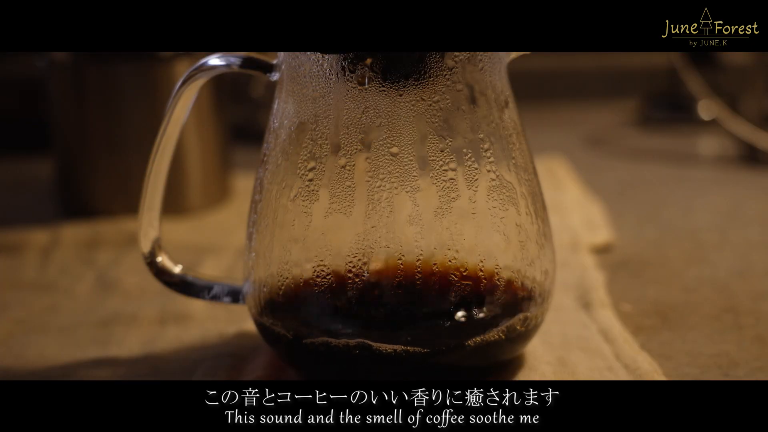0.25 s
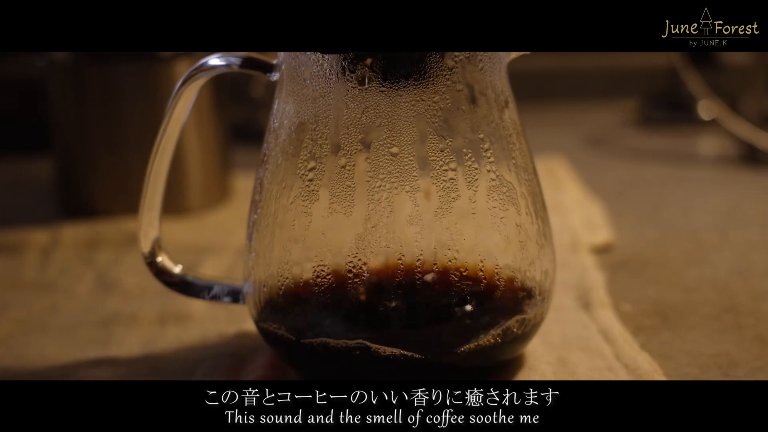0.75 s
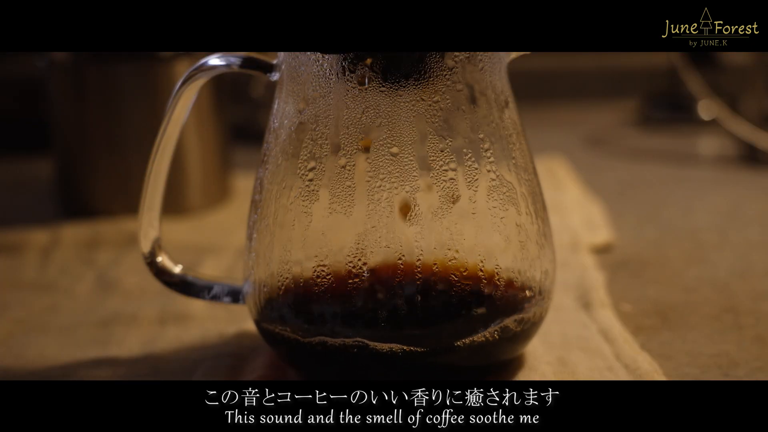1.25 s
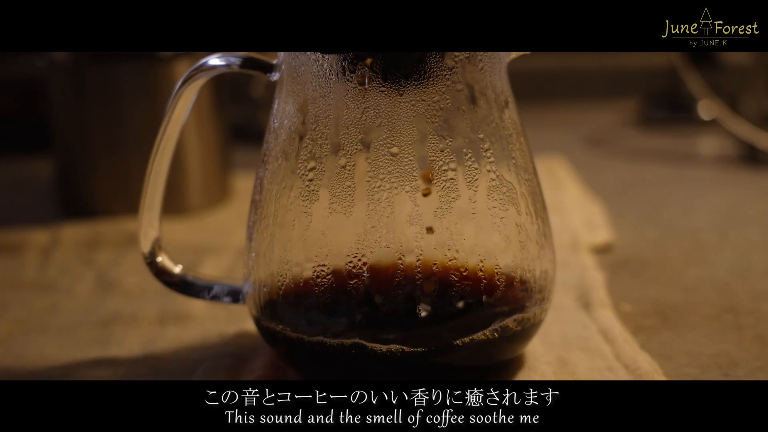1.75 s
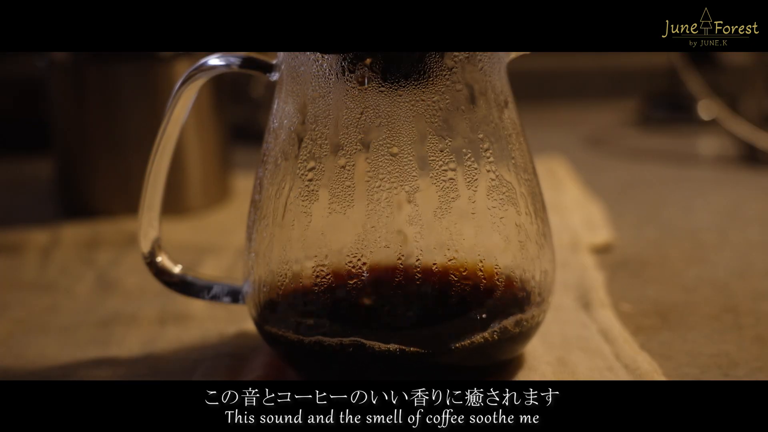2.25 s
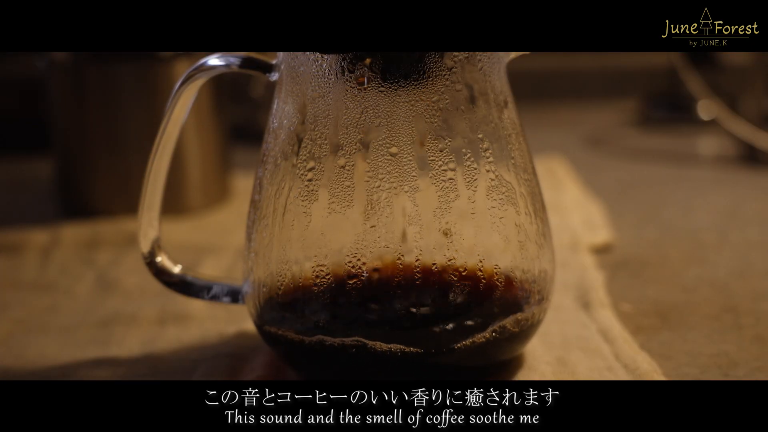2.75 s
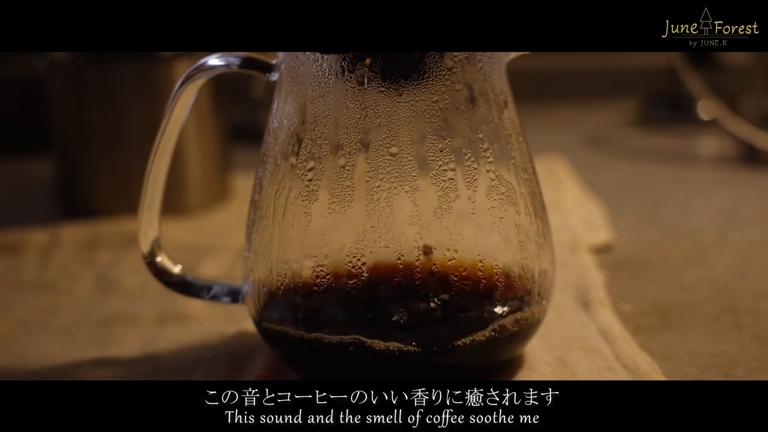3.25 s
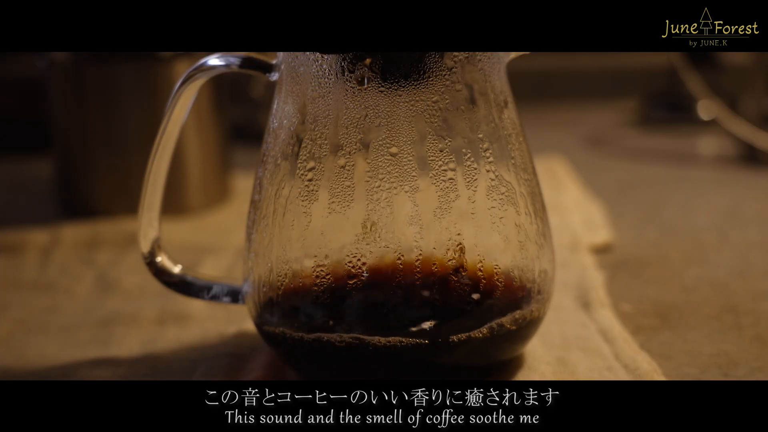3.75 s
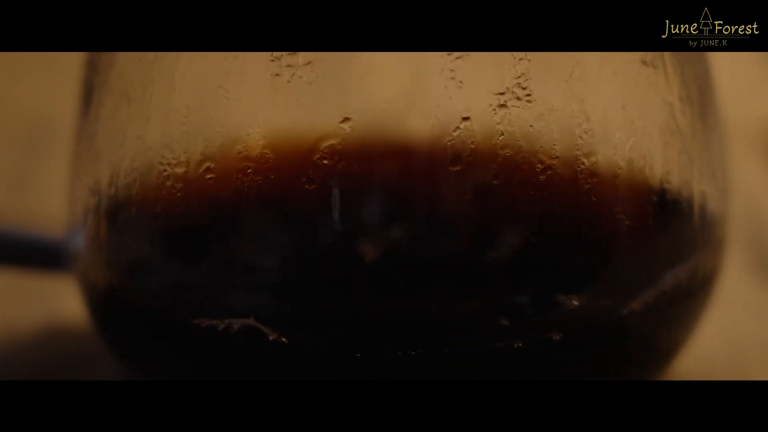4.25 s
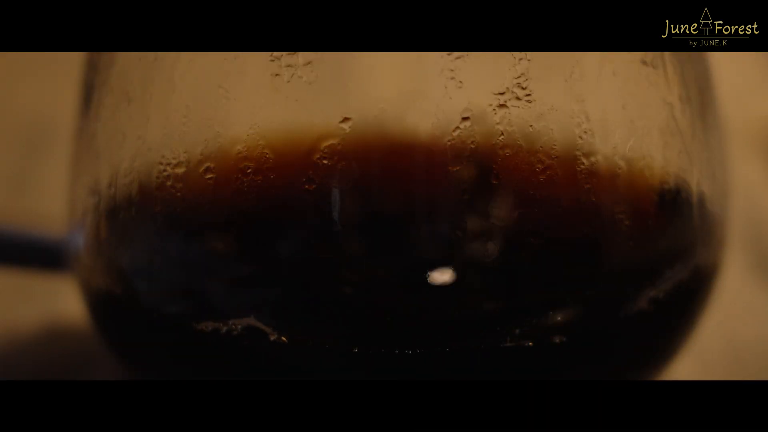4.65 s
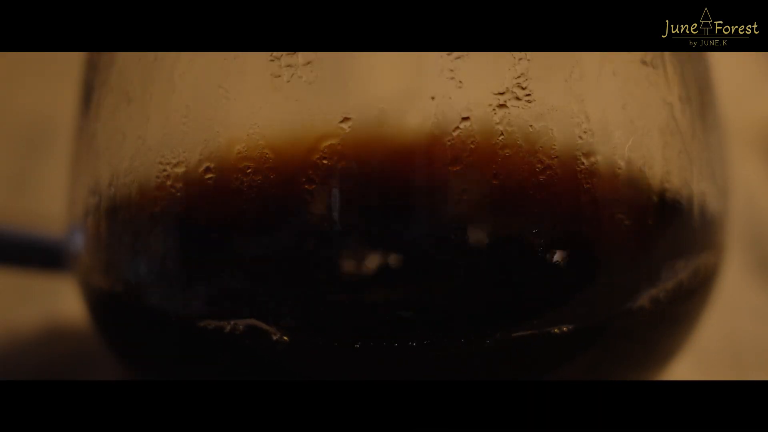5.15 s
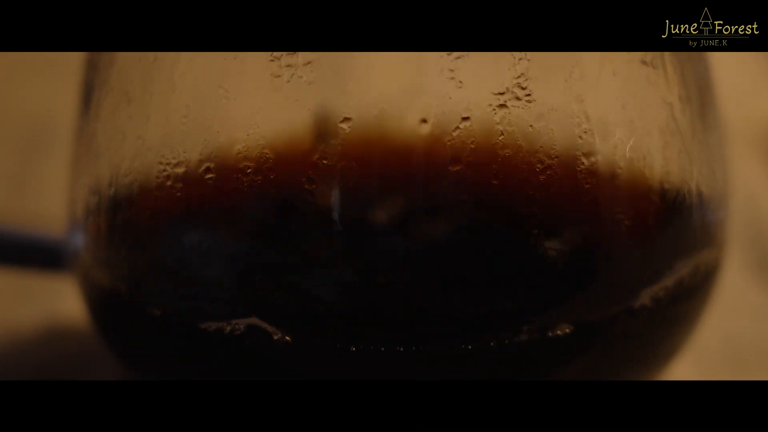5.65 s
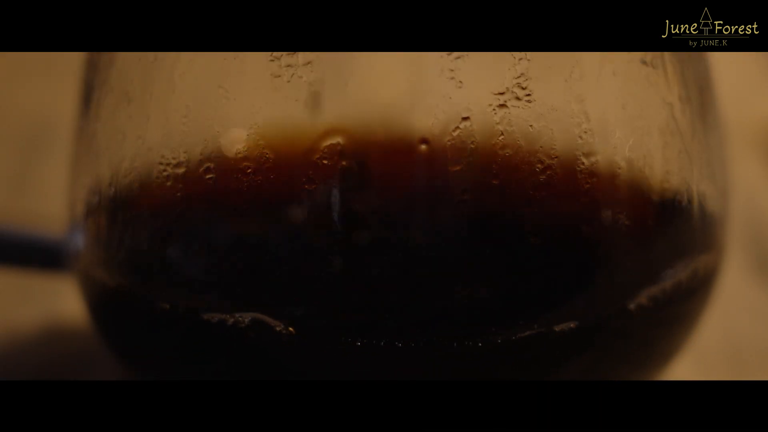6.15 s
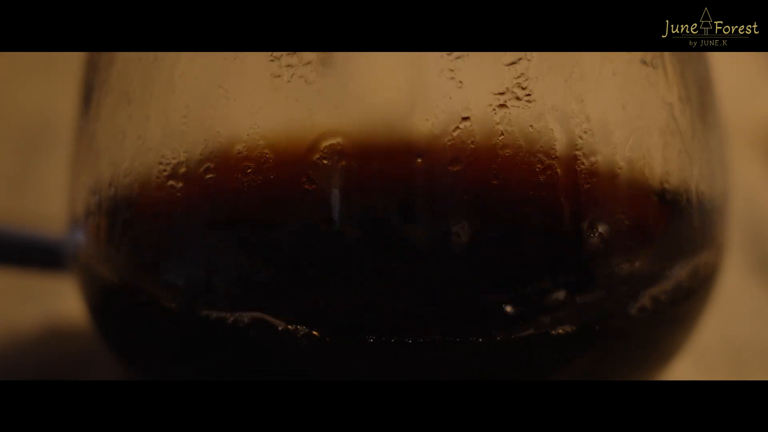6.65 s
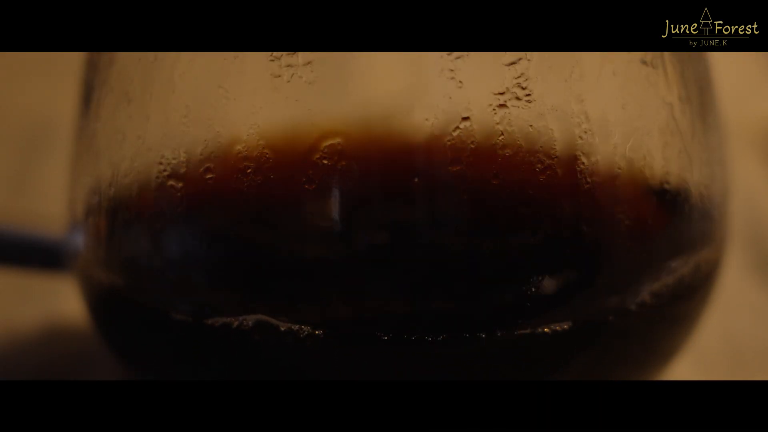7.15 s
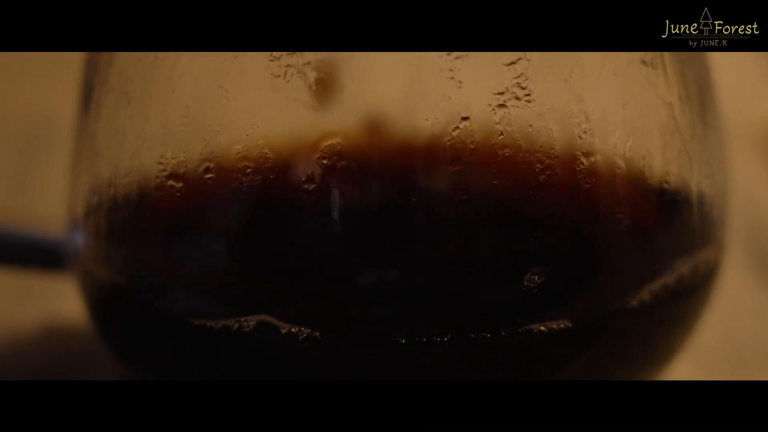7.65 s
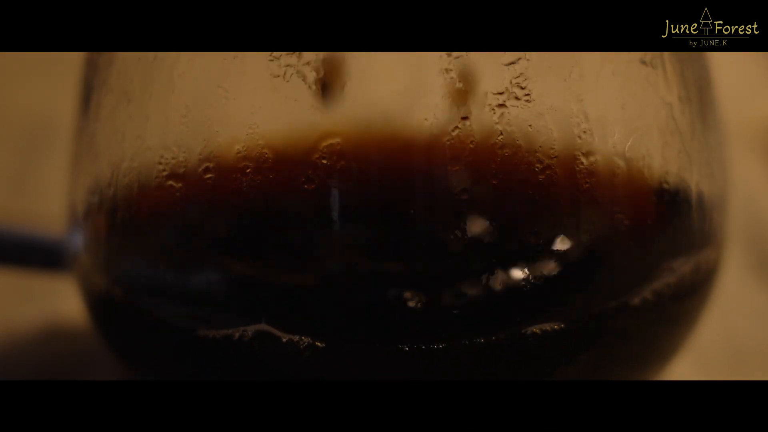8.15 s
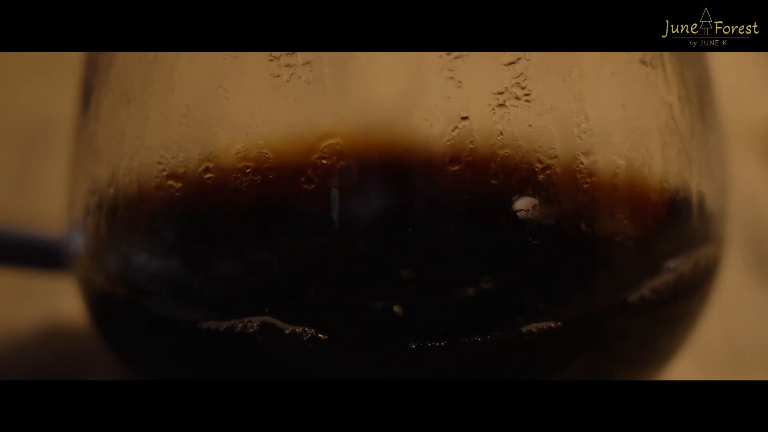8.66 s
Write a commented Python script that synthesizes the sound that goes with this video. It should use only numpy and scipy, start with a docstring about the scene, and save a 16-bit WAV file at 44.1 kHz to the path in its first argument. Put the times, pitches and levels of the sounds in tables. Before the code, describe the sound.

A close stereo view of coffee dripping into a glass server in a quiet kitchen. From 0 to 4 s, tiny wet plips fall rapidly and irregularly, bright bubble pings mixed with lower hollow plops, all coloured by the air in the glass. A light tap comes at 0.7 s, then a much louder, sharp clack at 1.6 s with a little sliding before it, and a small tap at 2.2 s followed by barely audible rubbing. A clear drop lands near 4.1 s; afterwards drips are sparse. A faint click at 5.2 s leads to a ringing cup clink at 5.9 s, a knock at 6.5 s, a short scrape and duller knock at 6.7 to 6.8 s. Soft splashes and pings return around 8 to 8.8 s with fine foam snaps and faint bright rustles. Low fridge hum, slightly swelling whine, rumble and soft hiss continue throughout.

```python
"""Coffee dripping in a quiet kitchen

Brewed coffee drips from a paper filter into a glass server. Drops slap the surface, and most trap a small
bubble: a decaying sine whose ping rings the air in the server. Other drops are dull splashes of noise, and
foam bursts with tiny snaps. To the right, things clack and rub on the counter: noise and struck tones
coloured by their resonances. Behind it all are a fridge made of wavering sines and a noise rumble with hiss.
"""
import sys
import numpy as np
from scipy import signal
from scipy.fft import rfft, irfft, next_fast_len
from scipy.io import wavfile
from scipy.ndimage import uniform_filter1d

SR = 44100
rng = np.random.default_rng(int(sys.argv[2]) if len(sys.argv) > 2 else 0)


def generate_wav(signal):
    """Clip the signal to [-1, 1] and save it as 16-bit WAV at the path in sys.argv[1]."""
    frames = np.transpose(np.atleast_2d(signal))
    scaled = np.clip(frames, -1, 1) * 32767
    pcm = np.round(scaled).astype(np.int16)
    wavfile.write(sys.argv[1], SR, pcm)


N = 392490
TIME = np.arange(N) / SR  # seconds from the start of the scene
AGE = TIME[:SR // 2]  # seconds from the start of one event
EARLY = int(.03 * SR)  # samples used to set an event's level
TOP_HZ = 15900

# all pans are left minus right, added before aside() places the near sounds
DRIP_PAN_DB, DRIP_PAN_SCATTER_DB = -1.2, 2.3
# slap against bubble at the usual pitch, and its gain per octave down
USUAL_BUBBLE_HZ, SLAP_DB, SLAP_DB_PER_OCTAVE = 2720, -6, 8.5
# droplets that splash back between the drops: centres of their random pitch and level
DROPLETS_PER_S, DROPLET_DB, DROPLET_HZ = .7, -60.5, 2400

# drops that trap a bubble: [start_s, starting pitch_hz, early level_db]
BUBBLE_DROPS = [(.02, 3000, -51.5), (.14, 2750, -48), (.323, 1540, -47.5), (.351, 2700, -52),
                (.4795, 2720, -48.5), (.575, 1730, -48.5), (.675, 2860, -48.5), (.8393, 1400, -47.5),
                (1.059, 1740, -52), (1.315, 2830, -54), (1.409, 2810, -44), (1.477, 2730, -52.5),
                (1.559, 2730, -48.5), (1.914, 3000, -48.5), (2.0923, 2760, -44), (2.161, 2380, -46),
                (2.261, 1700, -50), (2.607, 1500, -42), (2.6695, 2700, -42), (2.8965, 2750, -44.5),
                (2.933, 2250, -49), (3.161, 2800, -50), (3.288, 2565, -47), (3.48, 1530, -54.5),
                (3.5317, 1550, -47.5), (3.621, 2750, -48), (3.773, 1520, -53.5), (4.075, 2830, -39),
                (4.691, 3050, -56.5), (4.841, 2530, -48), (6.182, 2680, -50), (7.0, 2420, -52),
                (7.41, 2610, -52), (8.295, 2690, -43.5), (8.621, 2660, -54)]
# resonances of the air in the server: [pitch_hz, width_hz, relative gain_db]
SERVER_AIR = [(1040, 120, -10), (1430, 57, 4.5), (1582, 25.5, 15.5), (2200, 19, 12), (2440, 46, -1),
              (2636, 45, 5), (2687, 53, -4), (2760, 53, -9), (2940, 32, -31), (3770, 35, -50)]


def drops(bubble_t60=0.013, rise_per_s=0.83, open_db=-9):
    """A drop slaps the surface; its bubble pings, rising a little, and both ring the server's air."""
    f = freqs(AGE)
    server = undb(open_db) * resonance(f, 2240, 1900)
    server = server + sum(undb(db) * resonance(f, hz, width) for hz, width, db in SERVER_AIR)
    falls = BUBBLE_DROPS + sprinkle(DROPLETS_PER_S, DROPLET_HZ, DROPLET_DB)
    chances = rng.standard_normal((len(falls), 2))
    for (start_s, hz, level_db), (decay_chance, pan_chance) in zip(falls, chances):
        # each bubble dies away at its own speed, around the usual time
        t60 = bubble_t60 * undb(2.5 * decay_chance)
        ping = np.sin(2 * np.pi * hz * (AGE + rise_per_s * AGE ** 2 / 2)) * fade(AGE, t60)
        ping *= 1 - fade(AGE, 0.0024)
        # a bigger drop traps a lower bubble and slaps harder and more dully
        slap_db = SLAP_DB + SLAP_DB_PER_OCTAVE * np.log2(USUAL_BUBBLE_HZ / hz)
        slap = rng.standard_normal(len(AGE)) * fade(AGE, 0.0057)
        slap = shape(slap, resonance(f, np.sqrt(hz * 1700), 2560) ** 3)
        rung = shape(unit(ping) + undb(slap_db) * unit(slap), server)
        sound = kitchen(rung, wet_db=-2, t60=.17)
        pan_db = DRIP_PAN_DB + DRIP_PAN_SCATTER_DB * pan_chance
        yield start_s, sound * undb(level_db) / early(sound), pan_db


# drops that land without a bubble: [start_s, early level_db]
DULL_DROPS = [(7.9404, -44.5), (8.129, -44.5), (8.834, -48)]


def plops(plop_hz=1100, width_hz=1050, plop_t60=0.062):
    """A drop that traps no bubble makes only a dull splash of noise."""
    for start_s, level_db in DULL_DROPS:
        splash = rng.standard_normal(len(AGE)) * fade(AGE, plop_t60) * (1 - fade(AGE, .008))
        splash = shape(splash, resonance(freqs(AGE), plop_hz, width_hz) ** 2)
        sound = kitchen(splash, wet_db=0, t60=0.21)
        yield start_s, sound * undb(level_db) / early(sound), DRIP_PAN_DB


# fainter foam bursts: centres of their random pitch and level
FOAM_PER_S, FOAM_DB, FOAM_HZ = .7, -63.5, 8000
# the clearest bursts of foam: [start_s, pitch_hz, early level_db]
FOAM_BURSTS = [(1.914, 7160, -58.5), (2.865, 5250, -63), (3.1615, 5200, -51), (4.073, 6650, -57),
               (4.692, 6740, -59), (6.1835, 4700, -54.5), (8.298, 7000, -59), (8.503, 10200, -53.5),
               (8.6, 13800, -57)]


def foam(ping_db=-9, ping_t60=0.026):
    """A tiny bubble bursts with a snap of noise and a high ping."""
    for start_s, hz, level_db in FOAM_BURSTS + sprinkle(FOAM_PER_S, FOAM_HZ, FOAM_DB):
        snap = rng.standard_normal(len(AGE)) * fade(AGE, 0.017)
        snap = shape(snap, resonance(freqs(AGE), hz, 1.3 * hz) ** 2)
        ping = np.sin(2 * np.pi * hz * AGE) * fade(AGE, ping_t60)
        sound = kitchen(snap + undb(ping_db) * ping, wet_db=4, t60=0.15)
        yield start_s, sound * undb(level_db) / early(sound), DRIP_PAN_DB


def sprinkle(per_s, hz, level_db, octaves=0.27, scatter_db=2):
    """Faint events at random moments: rows of (start_s, pitch_hz, level_db)."""
    rows = []
    for when, pitch, loud in rng.uniform(-1, 1, (int(per_s * N / SR), 3)):
        start_s = (when + 1) / 2 * N / SR
        rows.append((start_s, min(hz * 2 ** (octaves * pitch), TOP_HZ), level_db + scatter_db * loud))
    return rows


# weight is the rattle time against this usual one: a heavier thing thuds more and is damped sooner
USUAL_RATTLE_S, WEIGHT_DAMPING = 0.011, .3
# thud level and decay time at the usual weight
KNOCK_THUD_DB, KNOCK_T60_S = -5.5, 0.32
KNOCK_ATTACK_S, KNOCK_PAN_DB = 0.0074, -2
# ringing against the rattle, before sharing between cup and metal
CUP_DB, METAL_DB = -1, -10

# things set down on the counter: [start_s, middle level_db, bass against it_db, treble against it_db,
# rattle_s, hollow pitch_hz, cup against metal (0 to 1)]
SET_DOWNS = [ (0.7071, -40, -2, -4.5, 0.01, 910, 0), (1.5828, -25, -10, 1, 0.015, 1160, .01),
             (2.1801, -65.5, -4, 16, 0.0028, 1200, 0.1), (2.199, -49.5, 0.5, -31, 0.006, 1160, 0),
             (5.197, -47, -19, -2.5, 0.0029, 1200, 0), (5.9326, -31.5, -1, -1, 0.0072, 1085, 0.94),
             (6.526, -33, -8.5, -4, 0.012, 1210, 0.05), (6.808, -31.5, -7.5, -17, .019, 1300, .03),
             (6.836, -45, -3, -1, 0.0044, 745, 0.05)]
# ringing tones of a cup: [pitch_hz, relative level_db, time to fade 60 dB_s]
CUP_TONES = [(415, -6, .14), (455, -8, .14), (630, 1.5, .38), (1095, -3, .1), (1131, -11, .33),
             (1211, -15, .85), (1551, -9, .31), (2552, -4, .28), (3000, -7, .25), (3510, -9, .25),
             (3777, -3, .34), (4860, -4, .25), (5417, -6, .26), (6390, -6, .25), (6595, -8, .25),
             (7670, -5, .32), (7800, 0, .08), (9022, -9, .21), (9521, -1, .23)]
# ringing tones of a small metal thing: [pitch_hz, relative level_db, time to fade 60 dB_s]
METAL_TONES = [(470, -4, .2), (1297, -6, .16), (3133, -2, .15), (3386, -6, .22), (5157, -3, .2),
               (5475, -7, .38), (6360, -7, .38), (7192, -5, .21), (7569, -4, .24), (9669, -4, .24),
               (9750, 0, .22), (11165, -3, .2), (11285, -4, .2)]


def knocks(room_db=-16):
    """A quick rattle of contacts rings the thing that is set down and dies away in the room."""
    for start_s, db, bass_db, treble_db, rattle_s, hollow_hz, cup in SET_DOWNS:
        weight = rattle_s / USUAL_RATTLE_S
        t60 = KNOCK_T60_S / weight ** WEIGHT_DAMPING
        thud_db = KNOCK_THUD_DB + 20 * np.log10(weight)
        # single contacts, 32 samples each, stand out at first and are smoother later
        steps = np.repeat(rng.standard_normal(len(AGE)), 32)[:len(AGE)]
        grain = undb(4 * fade(AGE, .4) * steps)
        # the nearer, right side starts loud and the left soft; then they even out
        blow = 1 + np.array([[-.3], [.7]]) * fade(AGE, 0.082)
        # hold for the rattle, then die away over a longer room tail
        decay = fade(np.maximum(AGE - rattle_s, 0), t60) + undb(room_db) * fade(AGE, 0.71)
        rattle = pair(len(AGE), 950) * grain * blow * decay * (1 - fade(AGE, KNOCK_ATTACK_S))
        cup_ring = np.sqrt(cup) * undb(CUP_DB) * ring(CUP_TONES)
        metal_ring = np.sqrt(1 - cup) * undb(METAL_DB) * ring(METAL_TONES)
        knock = rattle / early(rattle) + cup_ring + metal_ring
        levels = (db + bass_db, db, db + treble_db)
        yield start_s, contact(knock, knock[:, :EARLY], levels, hollow_hz, thud_db), KNOCK_PAN_DB


def ring(tones):
    """Struck tones, each a close beating pair; the low ones reach both sides nearly in step."""
    x = np.zeros((2, len(AGE)))
    for (hz, db, t60), chance in zip(tones, rng.uniform(-1.17, 1, (len(tones), 5, 1))):
        spread = np.pi * min(hz / 3000, 1)
        twin_hz = hz * (1 + 0.0053 * chance[4])
        tone = np.sin(2 * np.pi * hz * AGE + spread * chance[:2])
        twin = np.sin(2 * np.pi * twin_hz * AGE + spread * chance[2:4])
        x += undb(db) * fade(AGE, t60) * (tone + .5 * twin)
    x *= 1 - fade(AGE, .01)
    return x / early(x)


RUB_THUD_DB, RUB_PAN_DB = -5, -4
# things slid and handled: [middle_s, half length_s, middle level before the swell_db,
# brightness from band to band_db, hollow pitch_hz]
SLIDES = [(1.3, 0.14, -65, -10, 800), (1.506, 0.12, -60, 0.5, 900), (2.48, 0.85, -69, -2.5, 815),
          (6.37, 0.023, -63.5, -13, 530), (6.473, .06, -65.5, -11, 478), (6.687, 0.043, -51.5, 0.5, 750),
          (6.72, .017, -44.5, -3, 750), (7.984, 0.21, -69.5, 8, 1000), (8.86, 0.21, -71, 10.5, 1010)]


def rubs(room_db=-2):
    """Sliding contact swells and fades; low lumps and fine scratches catch apart, and the room trails."""
    noise = pair(N, 940)
    lumps = shape(noise, 1 / (1 + (freqs(noise) / 1300) ** 4))
    scratches = noise - lumps
    scrape = lumps * undb(2.2 * walk(110)) + scratches * undb(2.5 * walk(260))
    for middle_s, half_s, db, bright_db, hollow_hz in SLIDES:
        span = (TIME > middle_s - 3 * half_s) & (TIME < middle_s + 3 * half_s + .2)
        x, t = scrape[:, span], TIME[span]
        swell = np.exp(-((t - middle_s) / half_s) ** 2 / 2)
        trail = undb(room_db) * fade(np.maximum(t - middle_s, 0), 0.45) * (t > middle_s)
        rub = contact(x, x, (db - bright_db, db, db + bright_db), hollow_hz, RUB_THUD_DB)
        yield t[0], rub * np.maximum(swell, trail), RUB_PAN_DB


# bass, middle and treble of a contact: [low edge_hz, high edge_hz]
CONTACT_BANDS = [(300, 1400), (1400, 4500), (4500, 15000)]


def contact(x, probe, levels, hollow_hz, thud_db):
    """Colour a contact by its body, then tilt it to bring its probe stretch near three band levels."""
    f = freqs(probe)
    probe_body = body(f, hollow_hz, thud_db)
    plain = []
    for lo, hi in CONTACT_BANDS:
        band = shape(probe, probe_body * (f > lo) * (f < hi))
        plain.append(np.sqrt(np.mean(band ** 2)))
    low, middle, high = np.array(levels) - 20 * np.log10(plain)
    tilt = [(1100, low), (1800, middle), (3400, middle), (5400, high)]
    # silence at the end keeps the filter from wrapping round to the start
    size = next_fast_len(x.shape[1] + SR // 10)
    padded = np.hstack([x, np.zeros((2, size - x.shape[1]))])
    f = freqs(padded)
    return shape(padded, body(f, hollow_hz, thud_db) * colour(f, tilt))[:, :x.shape[1]]


# colour of counter and room: [pitch_hz, gain_db]
COUNTER_COLOUR = [(40, -18), (130, 3.5), (220, 2.5), (285, -13.5), (370, 6.5), (560, 3.5), (900, 6.5),
                  (1250, 3), (1700, -1.5), (3000, -4), (7000, 0), (10000, -3.5), (13000, -8), (16000, -16)]
# resonances of the counter's thud: [pitch_hz, width before squaring_hz, relative gain_db]
COUNTER_THUD = [(54.3, 28, 22.5), (229, 71, 5.5), (350, 86, 2), (502, 18, 0)]


def body(f, hollow_hz, thud_db, hollow_db=7):
    """Colour of a thing on the counter: a hollow resonance over a low thud."""
    thud = sum(undb(db) * abs(resonance(f, hz, width)) ** 2 for hz, width, db in COUNTER_THUD)
    hollow = undb(hollow_db) * abs(resonance(f, hollow_hz, 177)) ** 2
    plain = 1 / (1 + (480 / f) ** 3)  # little bass of its own
    return colour(f, COUNTER_COLOUR) * (plain + hollow + undb(thud_db) * thud)


# fridge motor: [pitch_hz, level before wavering_db]
FRIDGE_HUM = [(59.2, -67.5), (91.7, -61.5), (140.5, -67.5)]
# its whine: [pitch_hz, level before swell and wavering_db]
FRIDGE_WHINE = [(710.6, -73.5), (851, -71), (995.9, -70.5), (1066, -69.5), (1136.7, -65), (1346.5, -69.5),
                (1776, -78), (1954, -80), (2336, -82), (2686, -77.5), (4215, -98), (8936, -81.5)]
# slow swell of the whine: [time_s, gain_db]
WHINE_SWELL = [(0, -1.1), (4.0, -0.62), (4.3, -0.56), (8.9, 0.61)]


def fridge(hum_waver=0.037, whine_waver=0.51):
    """Motor hum, alike on both sides, and a wavering whine that arrives by way of the walls."""
    out = np.zeros((2, N))
    for hz, db in FRIDGE_HUM:
        level = np.sqrt(2) * undb(db) * (1 + hum_waver * walk(7.6))
        out += level * np.sin(2 * np.pi * hz * TIME + 0.14 * walk(15))
    swell = undb(np.interp(TIME, *np.transpose(WHINE_SWELL)))
    for hz, db in FRIDGE_WHINE:
        # each side gets its own starting phase
        phase = 2 * np.pi * hz * TIME + 0.65 * walk(9) + rng.uniform(-1.7, 1.0, (2, 1))
        level = np.sqrt(2) * undb(db) * swell * (1 + whine_waver * walk(14))
        out += level * np.sin(phase)
    return out


AIR_DB = -55.5  # rms before the rumble drifts
# colour of the still kitchen: [pitch_hz, relative level per Hz_db]
AIR_COLOUR = [(12, -42), (20, 7), (64, -22), (98, -12), (116, -7), (144, -10.5), (393, -24.5), (478, -16),
              (705, -14), (767, -14.5), (1100, -12.5), (1580, -19), (2270, -17), (3260, -25), (15500, -29)]


def air(rumble_db=2):
    """Room rumble that drifts a little, under an even hiss."""
    noise = pair(N, 880)
    f = freqs(noise)
    still = unit(shape(noise, colour(f, AIR_COLOUR)))
    rumble = shape(still, 1 / (1 + (f / 70) ** 4))
    return undb(AIR_DB) * (still + rumble * (undb(rumble_db * walk(4.06)) - 1))


def kitchen(x, wet_db, t60):
    """Direct sound and a short diffuse tail that builds within a few ms."""
    tail = pair(len(AGE), 1300) * fade(AGE, t60) * (1 - fade(AGE, 0.082))
    tail *= undb(wet_db) / np.sqrt(np.sum(tail ** 2) / 2)
    return x + signal.fftconvolve(x[None], tail, axes=1)[:, :len(x)]


LAG_S = 9e-5


def aside(x, shade_hz=260):
    """A source right of centre reaches the left side later; only the bass is alike on both sides."""
    f = freqs(x)
    x = shape(x, np.exp(-2j * np.pi * f * np.array([[LAG_S], [0]])))
    mid = x.mean(axis=0)
    return mid + shape(x - mid, 1 / (1 + (shade_hz / f) ** 2))


def add(out, start_s, x, pan_db):
    """Mix a stereo sound in at a time and a place."""
    i = max(int(start_s * SR), 0)
    panned = x * undb(np.array([[pan_db], [-pan_db]]) / 2)
    out[:, i:i + x.shape[1]] += panned[:, :max(N - i, 0)]


def pair(size, alike_hz):
    """Noise for two sides: the same in the bass, unrelated far above alike_hz."""
    mid, side = rng.standard_normal((2, size))
    alike = 1 / (1 + (freqs(mid) / alike_hz) ** 2)
    shared = shape(mid, np.sqrt(1 + alike))
    return shared + np.array([[1], [-1]]) * shape(side, np.sqrt(1 - alike))


def walk(rate):
    """Smooth random drift with a spread of 1, from new values drawn rate times a second."""
    k = int(SR / rate)
    steps = np.repeat(rng.standard_normal(N // k + 1), k)
    return unit(uniform_filter1d(uniform_filter1d(steps, k), k)[:N])


def resonance(f, hz, width):
    """Response of one resonance, gain 1 at its centre."""
    return 1 / (1 + 1j * (f ** 2 - hz ** 2) / (f * width))


def colour(f, points):
    """Gain along (pitch_hz, gain_db) points."""
    hz, db = np.transpose(points)
    return undb(np.interp(np.log(f), np.log(hz), db))


def shape(x, gain):
    """Filter by a gain for each frequency."""
    return irfft(rfft(x) * gain, x.shape[-1])


def freqs(x):
    """Frequency in Hz of each bin of a sound's spectrum, at least 1."""
    return np.maximum(np.arange(x.shape[-1] // 2 + 1) * SR / x.shape[-1], 1)


def fade(t, t60):
    """Exponential decay, 60 dB down after t60 seconds."""
    return np.exp(-np.log(1000) * t / max(t60, 1e-4))


def early(x):
    """Rms of the first 30 ms, the early level."""
    return np.sqrt(np.mean(x[..., :EARLY] ** 2))


def unit(x):
    """Scale to rms 1."""
    return x / np.sqrt(np.mean(x ** 2))


def undb(db):
    """Decibels to gain."""
    return 10 ** (np.asarray(db) / 20)


def scene():
    """Drips in front, handling to the right, the kitchen behind."""
    near = np.zeros((2, N))
    for source in (drops, plops, foam, knocks, rubs):
        for start_s, sound, pan_db in source():
            add(near, start_s, sound, pan_db)
    return aside(near) + fridge() + air()


def record(dry):
    """A steep low-pass filter cuts the top of the treble."""
    lowpass = signal.ellip(10, .2, 70, TOP_HZ, fs=SR, output="sos")
    return signal.sosfilt(lowpass, dry)


dry = scene()
out = record(dry)
generate_wav(out)
```